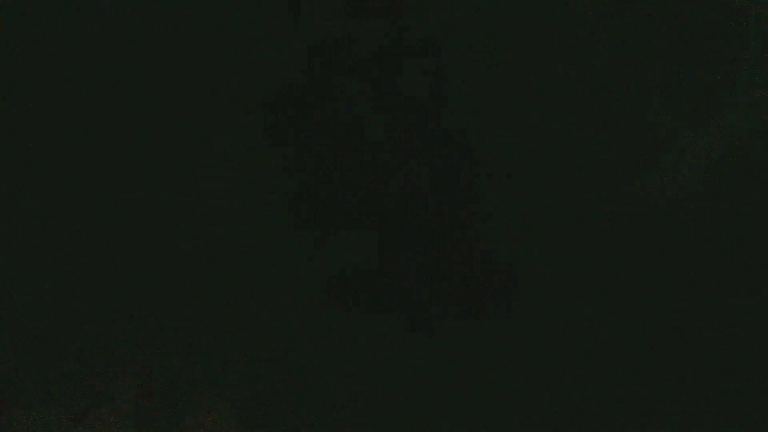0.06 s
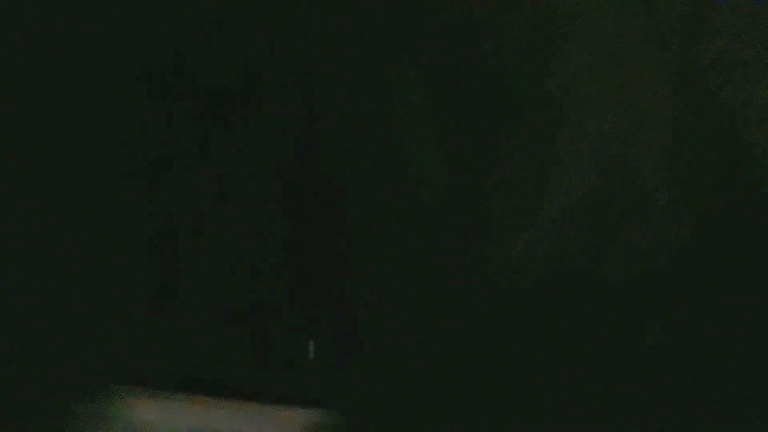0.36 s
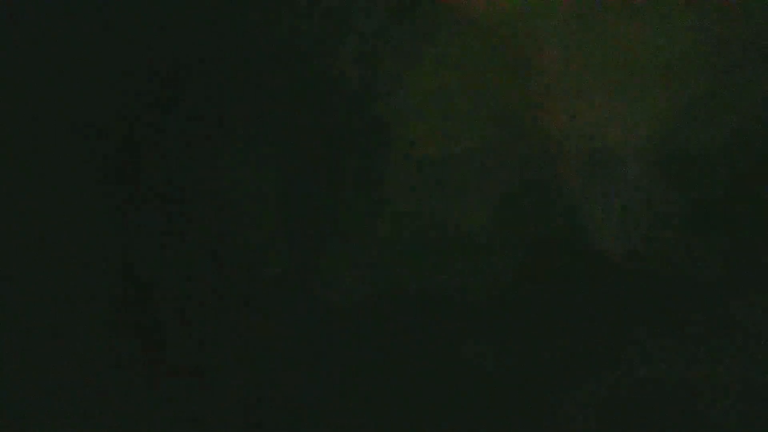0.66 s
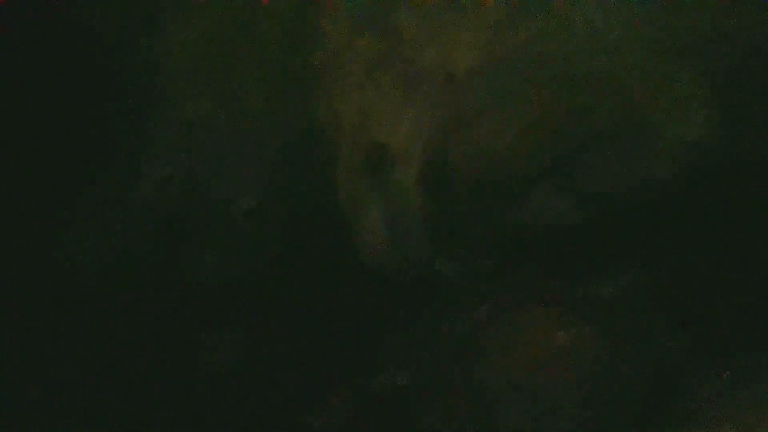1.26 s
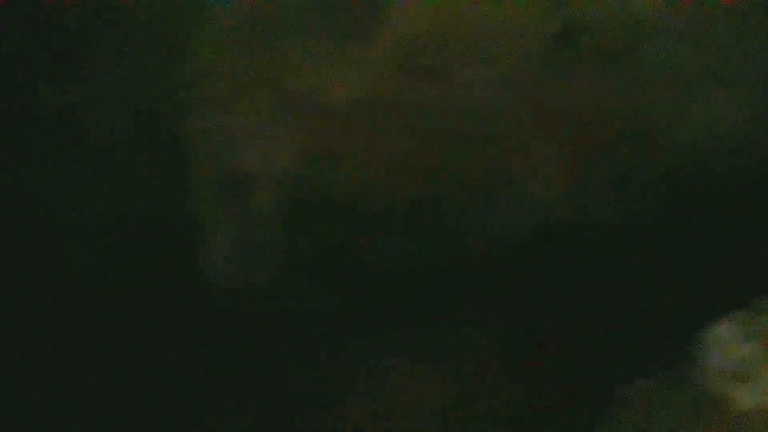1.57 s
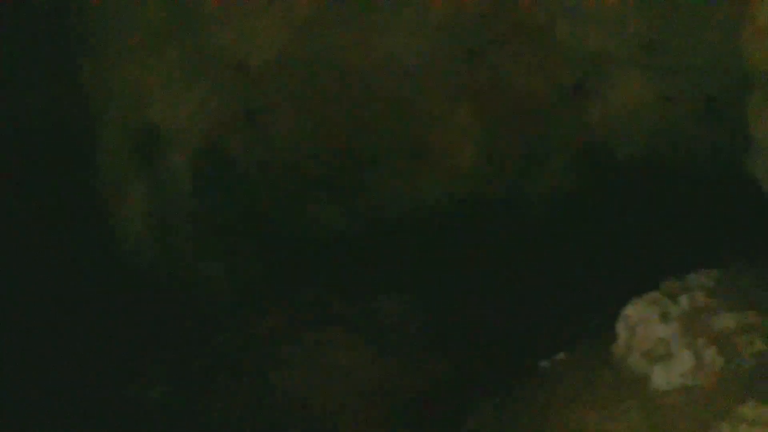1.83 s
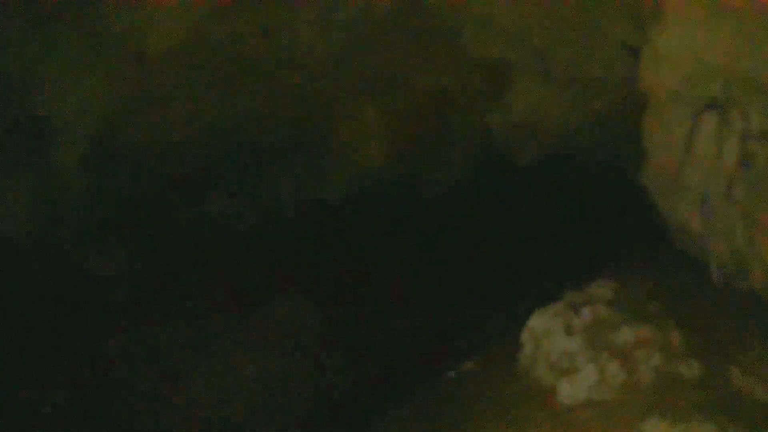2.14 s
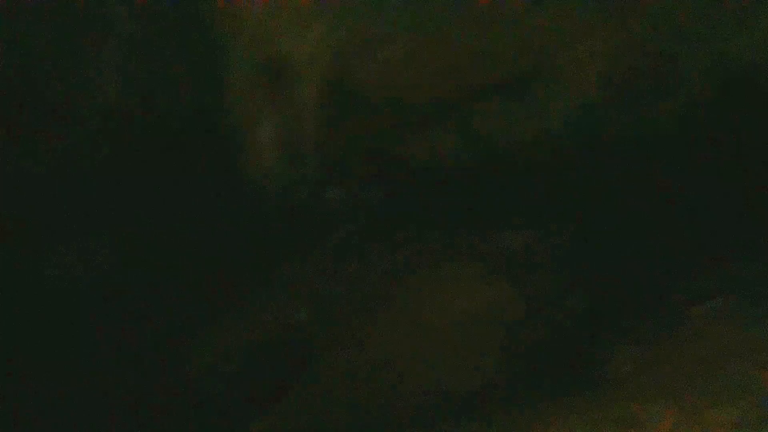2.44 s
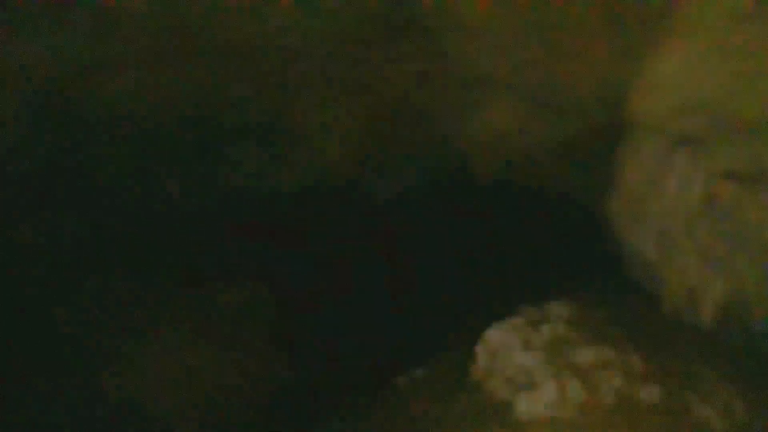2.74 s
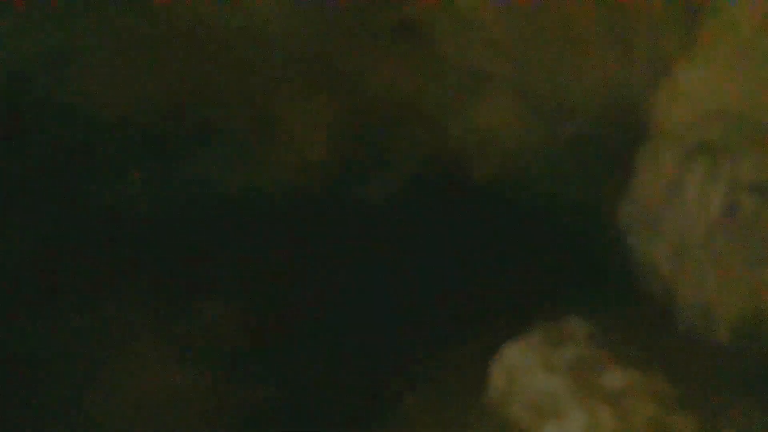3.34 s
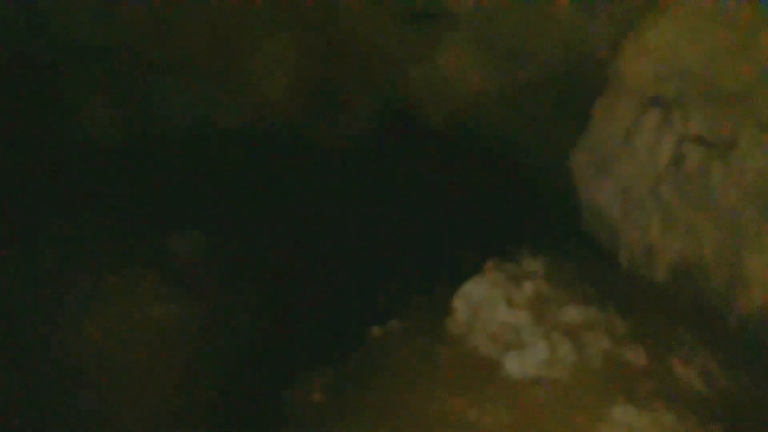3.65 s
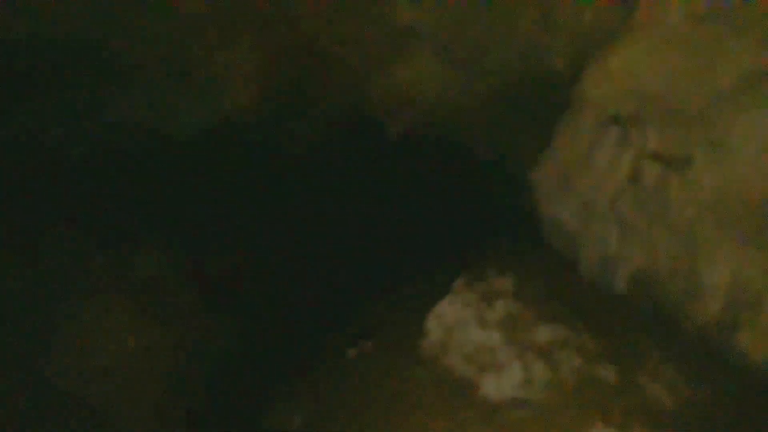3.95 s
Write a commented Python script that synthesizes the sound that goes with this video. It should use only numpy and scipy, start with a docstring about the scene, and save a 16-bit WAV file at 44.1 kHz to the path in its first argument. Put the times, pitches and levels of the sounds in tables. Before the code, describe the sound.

A bat colony chirps throughout in a dense, shrill wash, with lower chatter behind and a short cave echo. Nearer bats add brief squeals, thickest in the first second, and harsh screeches around 1, 1.3, 2, 2.7 and 3 seconds. A faint hollow rush of air lies underneath. Dull thumps hit the microphone at about 2.7 and 2.9 seconds, followed by soft hand rubbing and weaker bumps until 3.5.

```python
"""Inside a bat cave, heard from the microphone of a hand-held camera. Far off, the colony's countless
tiny falling chirps merge into a shrill wash with lower chatter from the back. Weaker squeaks come from
the roof, and nearer animals squeal and screech over it, all smeared by the rock walls. The air carries
a faint low, hollow rush. In the second half the camera is bumped a few times and the hand rubs on it."""
import sys
import numpy as np
from scipy import signal
from scipy.fft import rfft, irfft, next_fast_len
from scipy.io import wavfile
from scipy.ndimage import uniform_filter1d, minimum_filter1d, map_coordinates

SR = 44100
rng = np.random.default_rng(int(sys.argv[2]) if len(sys.argv) > 2 else 0)


def master_out(mix):
    """Clip the mix to full scale and print it as 16-bit PCM to the path in sys.argv[1]."""
    frames = np.transpose(np.atleast_2d(mix))
    ceiling = np.clip(frames, -1, 1)
    pcm = np.round(ceiling * 32767).astype(np.int16)
    wavfile.write(sys.argv[1], SR, pcm)


N = 176400  # 4 s
TOP_HZ = 15750  # upper edge of the microphone's band
FAR_WET, NEAR_WET = 0.77, 0.39  # the echo's share of the energy, for far and near bats


def amp(db):
    return 10 ** (np.asarray(db) / 20)


def unit_rms(x):
    return x / np.sqrt(np.mean(x ** 2) + 1e-20)


def along(points, hz):
    """Read (Hz, value) points on a log frequency axis."""
    freqs, values = np.transpose(points)
    return np.interp(np.log(hz + 1), np.log(freqs + 1), values)


def curve(rows):
    """Spread (seconds, value) rows to one value per sample."""
    return np.interp(np.arange(N) / SR, *np.transpose(rows))


def wobble(rate, size):
    """A smooth random curve, rate knots a second."""
    return map_coordinates(rng.standard_normal(1024), [np.arange(size) * rate / SR], mode="wrap")


def filtered(x, response):
    """Filter x by a gain given as a function of Hz."""
    size = next_fast_len(N + SR // 2)
    return irfft(rfft(x, size) * response(np.fft.rfftfreq(size, 1 / SR)), size)[:N]


def coloured(x, spectrum):
    """x shaped by (Hz, dB) points, at rms 1."""
    return unit_rms(filtered(x, lambda hz: amp(along(spectrum, hz))))


def noise(spectrum):
    return coloured(rng.standard_normal(N), spectrum)


def add(track, start_s, sound):
    i = int(np.clip(start_s * SR, 0, N - 1))
    track[i:i + len(sound)] += sound[:N - i]


# The air all around the microphone: its rush and its resonance. Each row: frequency in Hz, gain in dB.
RUSH_COLOUR = [(20, -44), (45, -21), (75, -8.5), (110, 0), (170, 0), (260, -2), (450, -5), (800, -15.5),
               (1200, -9), (3000, -22.5)]
HOLLOW_COLOUR = [(250, -22), (450, -6), (600, -1), (850, 0.5), (1100, -9.5), (1500, -32.5)]
# The resonance eases a little midway. Each row: time in seconds, level in dB.
HOLLOW_LEVEL = [(0, -40.5), (1.7, -40.5), (2.3, -43), (4, -42.5)]


def cave_air(rush_db=-43.5):
    """A steady low rush fills the cave, and the enclosed air rings hollow."""
    return amp(rush_db) * noise(RUSH_COLOUR) + amp(curve(HOLLOW_LEVEL)) * noise(HOLLOW_COLOUR)


# The echo off the surrounding rock. Each row: frequency in Hz, seconds to die away by 60 dB.
CAVE_DECAY = [(500, 0.51), (5000, 0.62), (15000, 0.38)]


def cave_echo(x, wet):
    """Direct sound plus a diffuse tail from the walls, whose highest treble dies first."""
    hz, t, spectra = signal.stft(rng.standard_normal(SR // 2), SR, nperseg=256)
    decay = amp(-60 * t / along(CAVE_DECAY, hz)[:, None])
    tail = signal.istft(spectra * decay, SR, nperseg=256)[1]
    response = np.sqrt(wet) * tail / np.linalg.norm(tail)
    response[0] += np.sqrt(1 - wet)  # the direct path
    return signal.fftconvolve(x, response)


def patchy(x, depth_db=.9):
    """Groups of neighbouring pitches swell and fade by chance."""
    spectra = signal.stft(x, nperseg=512)[2]
    across_pitch = uniform_filter1d(rng.standard_normal(spectra.shape), size=7, axis=0)
    swells = unit_rms(uniform_filter1d(across_pitch, size=14, axis=1))
    return signal.istft(spectra * amp(depth_db * swells), nperseg=512)[1][:N]


def swarm(chirps_per_s=5000, chirp_s=0.00405, fall=0.26, spread_db=3.5):
    """Thousands of tiny falling chirps; each moment's callers echo by a different path."""
    lead_in = SR // 2  # the cave is already ringing at the start
    span = N + lead_in
    when, pitch, phase = rng.random((int(chirps_per_s * span / SR), 3)).T[:, :, None]
    k = np.arange(int(chirp_s * SR))
    progress = k / len(k)
    cycles = pitch * TOP_HZ * k / SR * (1 + fall * (1 - progress) / 2) + phase
    strength = amp(spread_db * rng.standard_normal(when.shape))
    chirps = strength * np.sin(np.pi * progress) * np.sin(2 * np.pi * cycles)
    positions = (when * span).astype(int) + k
    mass = np.bincount(positions.ravel(), chirps.ravel(), span)
    out, step = np.zeros(span + SR), SR // 10
    for i in range(0, span, step):
        echo = cave_echo(mass[i:i + step], FAR_WET)
        out[i:i + len(echo)] += echo
    return patchy(out[lead_in:span])


# The far colony: how busy it is, its overtones, and the chatter at the back of the cave.
# Each row: time in seconds, relative level in dB.
ACTIVITY_LEVEL = [(0, -14.5), (.18, -14.5), (.24, -17), (.33, -16), (.47, -19), (.52, -16), (.62, -17.5),
                  (.8, -16), (.98, -16), (1.07, -14.5), (1.17, -16.5), (1.42, -15.5), (1.49, -18),
                  (1.62, -14.5), (1.68, -16.5), (1.78, -14), (2.0, -13.5), (2.2, -13.7), (2.28, -16),
                  (2.33, -13.5), (2.54, -14.5), (2.6, -19), (2.64, -15), (2.84, -13.8), (2.92, -16.5),
                  (2.98, -14), (3.27, -14), (3.46, -16.3), (3.58, -13.3), (3.7, -14.5), (3.8, -13),
                  (4, -13.5)]
OVERTONE_LEVEL = [(0.0, -25), (0.61, -27), (0.65, -25.5), (1.2, -28.5), (1.22, -25.5), (1.53, -30.5),
                  (1.76, -25.5), (2.53, -28), (2.61, -33), (2.63, -29), (2.81, -25.5), (2.88, -27.5),
                  (3.43, -27.5), (3.45, -30), (3.56, -26), (4.0, -25.5)]
CHATTER_LEVEL = [(0, -29.5), (.7, -28.8), (1.3, -28.5), (1.55, -30.5), (1.9, -29), (2.3, -32), (2.7, -31.5),
                 (3.2, -30), (4, -30)]
# The same three layers as they reach the microphone. Each row: frequency in Hz, gain in dB.
CHORUS_COLOUR = [(2000, -40), (3000, -20.5), (3700, -13.5), (4150, -8), (4700, -2), (5600, -1.5),
                 (6500, -2.5), (7200, -5), (8100, -12.5), (9600, -21.5), (12000, -43)]
OVERTONE_COLOUR = [(7000, -26), (9800, -15), (11000, -4), (12500, -2.5), (14200, -1), (15600, -2)]
CHATTER_COLOUR = [(900, -27.5), (1250, -9), (1700, -2), (2400, -1), (3200, 2), (4500, 0.5), (7000, -30)]


def far_colony(chorus_trim_db=-0.97, overtone_trim_db=0.6, chatter_follows=0.32):
    """Massed chirps blur into a shrill chorus, its overtones and a steadier, lower chatter."""
    busy_db = curve(ACTIVITY_LEVEL)
    chatter_db = curve(CHATTER_LEVEL) + chatter_follows * (busy_db - busy_db.mean())
    chorus = amp(busy_db + chorus_trim_db) * coloured(swarm(), CHORUS_COLOUR)
    overtones = amp(curve(OVERTONE_LEVEL) + overtone_trim_db) * coloured(swarm(), OVERTONE_COLOUR)
    chatter = amp(chatter_db) * coloured(swarm(), CHATTER_COLOUR)
    return chorus + overtones + chatter


def whistle(hz, envelope, harmonic_db=-18.5):
    """A bat's voice: a tone with its second harmonic, at rms 1."""
    phase = 2 * np.pi * np.cumsum(hz) / SR
    return unit_rms(envelope * (np.sin(phase) + amp(harmonic_db) * np.sin(2 * phase)))


def squeal(length_s, hz, glide, rough, quaver_hz=422):
    """One gliding call; roughness shakes its pitch and strength."""
    progress = np.linspace(0, 1, int(max(length_s, .005) * SR))
    quaver = 0.1025 * rough * wobble(quaver_hz, len(progress))
    flutter = np.exp(rough * wobble(quaver_hz, len(progress)))
    arch = np.sqrt(abs(np.sin(np.pi * progress)))
    return whistle(hz * (1 + glide * (progress - .5) + quaver), arch * flutter)


# Single bats near the microphone. Each row: start in seconds, length in seconds, pitch in Hz,
# glide as a share of the pitch, level in dB, roughness from 0 to 1.
NEAR_SQUEALS = [(0, 0.036, 5050, 0.0015, -16, 0.22), (.09, 0.086, 5100, -0.043, -21, 0.58),
                (.29, 0.17, 4700, 0.043, -22.5, 0.25), (0.489, 0.035, 4760, 0, -28, 0.04),
                (.56, .06, 4760, -0.11, -18, 0.27), (.62, .11, 3520, .04, -30.5, .35),
                (.635, 0.064, 1800, 0.089, -35.5, 0.36), (0.646, .13, 6300, -0.022, -20.5, 0.26),
                (0.656, .05, 4620, 0.01, -25, 0.23), (0.838, 0.058, 5150, -0.17, -19.5, 0.22),
                (0.831, .04, 6370, -0.047, -20, 0.24), (0.883, 0.072, 7200, 0, -20, 0.1),
                (.94, 0.045, 5000, -.04, -20, 0.15), (1.198, .08, 2180, -.1, -33.5, 0.56),
                (1.255, 0.03, 4560, 0, -17, 0.05), (1.408, 0.042, 3120, -0.013, -33, 0.08),
                (1.985, 0.051, 5540, 0, -26, 0), (2.117, 0.14, 5950, 0, -20.5, 0.33),
                (2.39, 0.055, 2570, 0, -37.5, 0.1), (2.772, .04, 4450, 0, -26, 0.07),
                (3.011, 0.035, 3000, -0.01, -35, .2), (3.01, 0.034, 5500, 0, -19, 0.42),
                (3.364, 0.067, 2010, 0.024, -37, 0.34), (3.369, .04, 4900, 0, -19, 0.27)]


def near_squeals():
    """Nearby animals squeal, each with the echo of its own perch."""
    out = np.zeros(N)
    for start_s, length_s, hz, glide, db, rough in NEAR_SQUEALS:
        add(out, start_s, amp(db) * cave_echo(squeal(length_s, hz, glide, rough), NEAR_WET))
    return out


def roof_squeaks(per_s=48, typical_s=.025, centre_hz=5730, base_db=-25.5):
    """Weaker squeaks scattered over the roof at middle distance, more echo than direct sound."""
    out = np.zeros(N)
    for _ in range(int(per_s * N / SR)):
        when, rough = rng.random(2)
        length, pitch, glide, strength = rng.standard_normal(size=4)
        hz = centre_hz * np.exp(.256 * np.tanh(pitch))
        db = base_db + 4.3 * np.tanh(strength) - 2 * abs(pitch)  # outlying pitches are fainter
        call = squeal(typical_s * np.exp(.4 * length), hz, .12 * glide, rough)
        add(out, when * N / SR, amp(db) * cave_echo(call, FAR_WET))
    return out


def screech(length_s, hz, chirps_per_s=230, fall=0.415, spread_db=1.5):
    """A rapid, uneven train of chirps, each sweeping down by a share of the pitch."""
    size = int(length_s * SR)
    chirp_count = np.cumsum(chirps_per_s * np.exp(.3 * wobble(chirps_per_s, size))) / SR
    arch = np.sqrt(abs(np.sin(np.pi * np.linspace(0, 1, size))))
    strength = arch / amp(spread_db * wobble(chirps_per_s, size))
    pitch = hz * (1 + fall * (.5 - chirp_count % 1) + .06 * wobble(chirps_per_s, size))
    return whistle(pitch, strength * np.sin(np.pi * chirp_count) ** 2)


# Harsh calls near the microphone. Each row: start in seconds, length in seconds, pitch in Hz, level in dB.
NEAR_SCREECHES = [(0.683, 0.11, 7200, -21), (1.03, 0.078, 6100, -15), (1.337, 0.097, 6420, -18),
                  (1.93, 0.13, 5930, -17.5), (2.088, 0.1, 6100, -16), (2.479, .06, 5570, -21),
                  (2.657, 0.093, 6270, -18), (2.955, 0.057, 6040, -15.5)]


def near_screeches():
    """Nearby animals screech, each with the echo of its own perch."""
    out = np.zeros(N)
    for start_s, length_s, hz, db in NEAR_SCREECHES:
        add(out, start_s, amp(db) * cave_echo(screech(length_s, hz), NEAR_WET))
    return out


# Knocks right at the microphone. Each row: start in seconds, peak in dB, treble cutoff in Hz.
CAMERA_BUMPS = [(2.722, -13, 790), (2.933, -8.5, 740), (3.141, -40, 300), (3.441, -23.5, 417),
                (3.527, -35, 220)]


def camera_bumps(low_cut_hz=110):
    """Each bump is one dull push on the camera body, with no ring."""
    out = np.zeros(N)
    low_cut = signal.butter(3, low_cut_hz, btype="high", fs=SR, output="sos")
    for start_s, db, cutoff_hz in CAMERA_BUMPS:
        treble_cut = signal.butter(4, cutoff_hz, fs=SR, output="sos")
        push = signal.sosfilt(treble_cut, signal.unit_impulse(SR // 20))
        push = signal.sosfilt(low_cut, push)
        add(out, start_s, -amp(db) * push / abs(push).max())
    return out


# The hand shifting beside the microphone. Each row: time in seconds, level in dB.
RUB_LEVEL = [(3.1, -75), (3.17, -45), (3.23, -49), (3.33, -45), (3.42, -51), (3.5, -75)]
# Its muffled tone. Each row: frequency in Hz, gain in dB.
RUB_COLOUR = [(120, -16), (250, -2), (430, -9), (600, -14), (1500, -50)]


def hand_rub():
    """Skin slides softly over the camera body."""
    return amp(curve(RUB_LEVEL)) * noise(RUB_COLOUR)


def scene():
    """Air, handling and bats near and far, the same in both channels."""
    air = cave_air()
    handling = camera_bumps() + hand_rub()
    bats = near_squeals() + near_screeches() + far_colony() + roof_squeaks()
    mono = air + handling + bats
    return np.array([mono, mono])


def record(dry, ceiling=.92):
    """The camera limits the highest peaks and keeps nothing above its band limit."""
    needed_gain = ceiling / np.maximum(abs(dry).max(axis=0), ceiling)
    gain = uniform_filter1d(minimum_filter1d(needed_gain, size=257), size=129)
    return np.array([filtered(gain * channel, lambda hz: hz < TOP_HZ) for channel in dry])


dry = scene()
out = record(dry)
master_out(out)
```